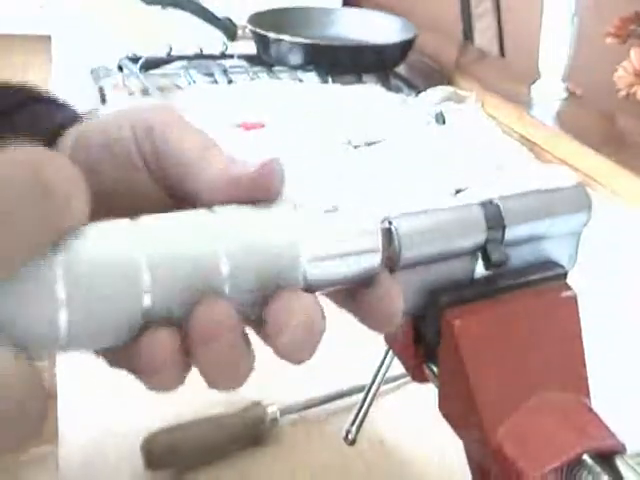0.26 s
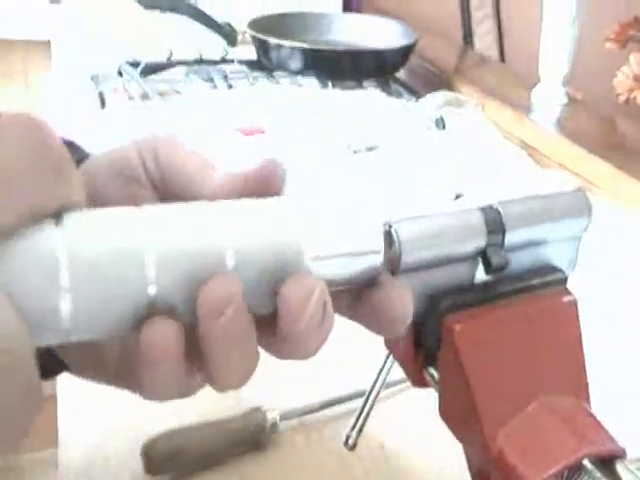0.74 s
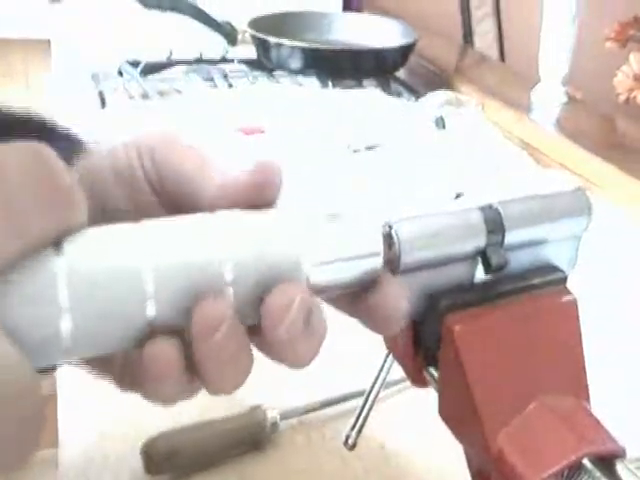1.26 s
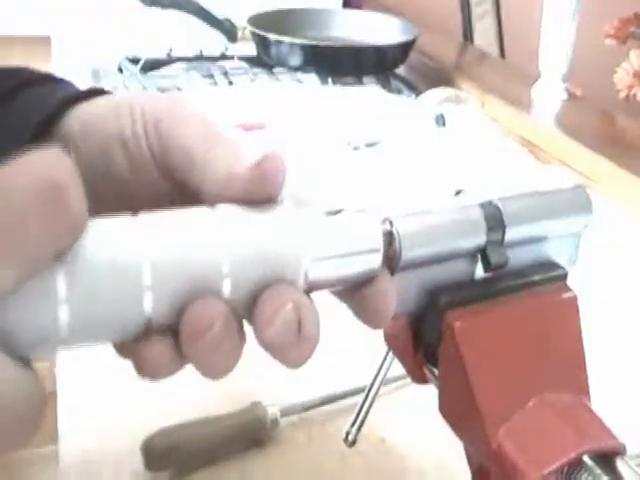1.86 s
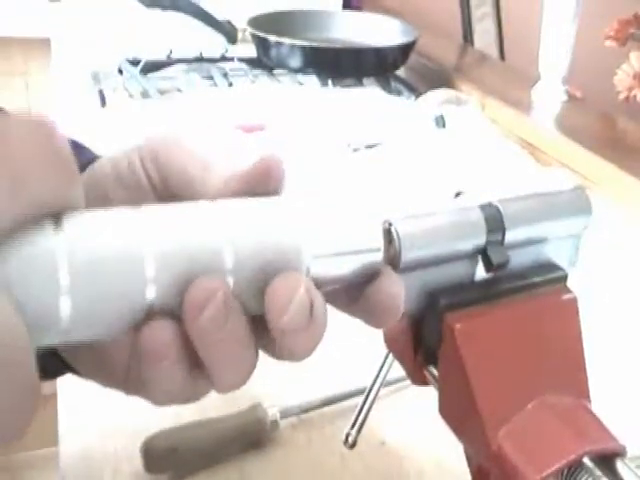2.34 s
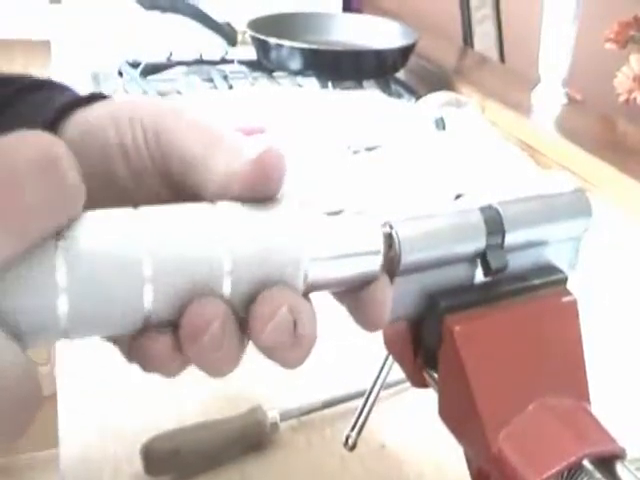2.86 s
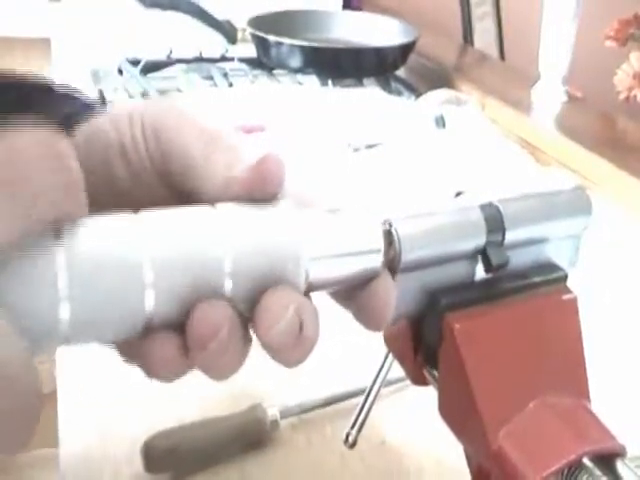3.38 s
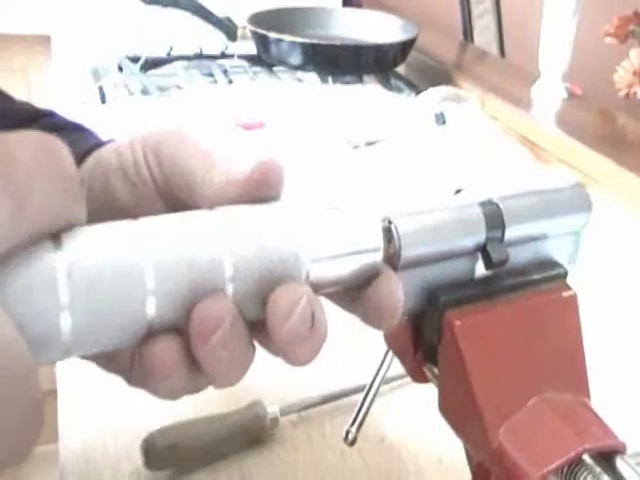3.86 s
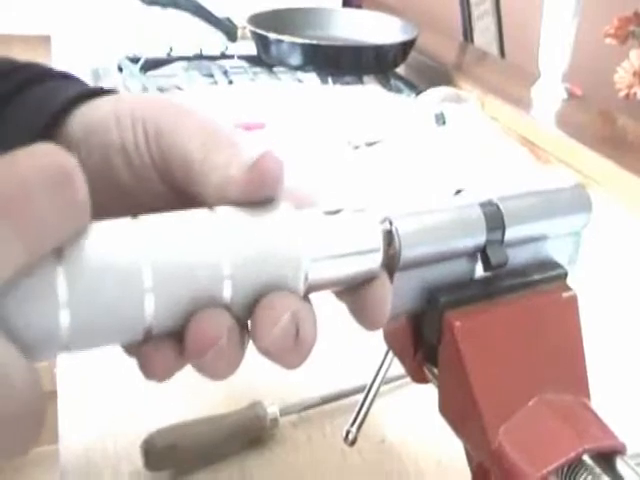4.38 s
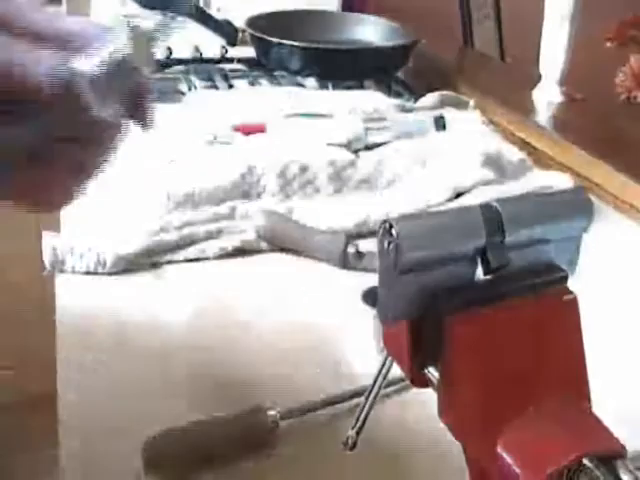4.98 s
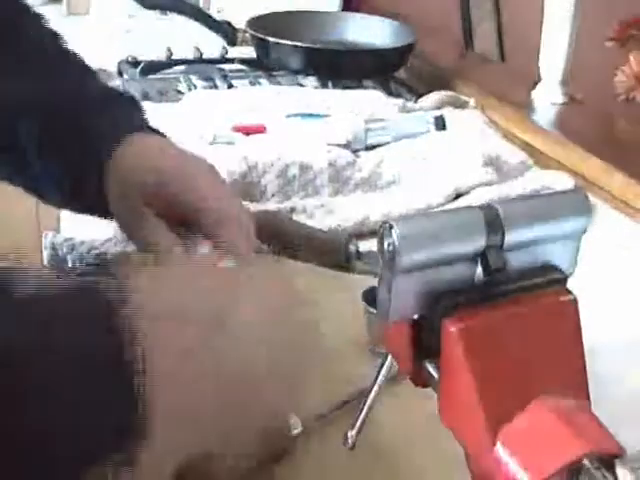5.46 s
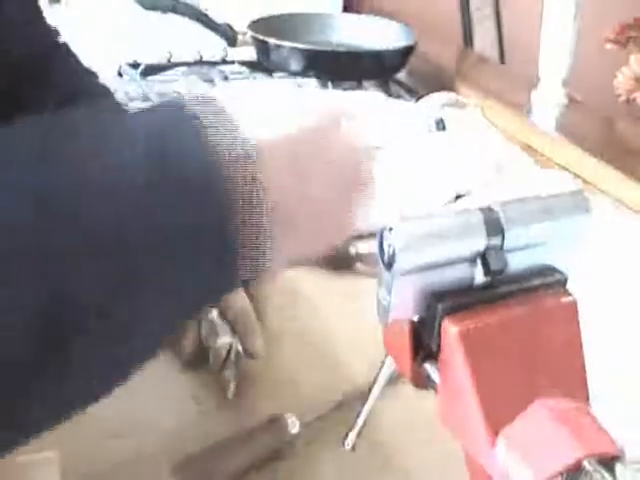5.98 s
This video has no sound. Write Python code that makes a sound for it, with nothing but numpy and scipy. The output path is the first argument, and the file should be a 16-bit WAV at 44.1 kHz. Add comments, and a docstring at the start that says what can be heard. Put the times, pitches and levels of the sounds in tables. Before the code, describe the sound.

Close, irregular clunks and metallic clicks over a rumbling, creaking table, a quick rasping pull, then small metal parts clinking and knocking on wood.

```python
"""Small quiet room: a key blank in a long handle is rocked and twisted in a cylinder lock in a table vice.
Each jolt, a burst of contact noise, rings modes of lock (tick), handle (knock) and table (thud).
The table rumbles and creaks under load; the blank is then dragged out over the pins as dense clicks.
Small metal parts are put down, clink and slide. Swish, rustle, thin tones, echoes and hiss are shaped noise,
the rustle with added grains of rubbing; all is heard through a close, noisy microphone pair."""
import sys
import numpy as np
from scipy import signal
from scipy.io import wavfile

SR = 44100
rng = np.random.default_rng(int(sys.argv[2]) if len(sys.argv) > 2 else 0)


def to_wav(sig):
    """Store sig (one row per channel, or 1-D mono) as 16-bit WAV at the path in sys.argv[1].

    Samples outside -1..1 are clipped; the rate is SR.
    """
    pcm = np.clip(np.atleast_2d(sig), -1, 1) * 32767
    pcm = np.round(pcm).astype(np.int16)
    wavfile.write(sys.argv[1], SR, pcm.T)  # frames by channels


N = 274807
BRIEF_SAMPLES = SR // 2   # noise enough for one short gesture

# jolts of the blank in the lock: start_s, knock_db, thud_db, tick_db, sparkle_db
JOLTS = [(0.0446, -48, -24.5, -31, -32), (0.2272, -14.5, -11.5, -25, -33), (0.391, -15.5, -16, -33, -41),
         (0.4184, -31, -46, -25, -30), (0.4648, -9, -43, -10, -14), (0.4808, -2, -17, -14, -27),
         (0.4921, -31, -37, -35, -25), (0.6733, -31, -22, -39, -34), (0.7622, 0.5, -18, -30, -22),
         (0.9353, 0.5, -30, -23, -33), (0.9454, -17, -33, -22, -24.5), (1.1069, -2.5, -30, -47, -42),
         (1.283, -3, -43, -36, -30), (1.2941, -49, -17, -13, -20.5), (1.3811, -8, -15.5, -26, -46),
         (1.4614, -6, -38, -15.5, -12), (1.4704, -21, -18.5, -16, -20), (1.483, -9.5, -16.5, -18, -26),
         (1.7318, -14.5, -15.5, -33, -39), (1.916, -11, -15, -30, -37), (2.0649, -27, -14.5, -34, -46),
         (2.1825, -45, -41, -17.5, -17), (2.2195, -7, -11.5, -11, -13), (2.2339, -5.5, -5.5, -18, -26),
         (2.2417, -20, -20, -32, -36), (2.4239, -26, -31, -24.5, -34), (2.4438, -20, -48, -43, -48),
         (2.5084, 0, -21, -24, -33), (2.604, -10, -28, -30, -36), (2.6705, -8.5, -17.5, -27.5, -42),
         (2.8686, -46, -49, -22, -33), (2.9021, -29, -37, -11, -9.5), (2.9108, -6.5, -28, -7, -19),
         (2.9244, -8.5, -20, -24, -17), (3.1524, -8, -9, -24, -35), (3.1749, -16, -45, -28, -38),
         (3.3089, -25, -21, -37, -43), (3.3301, -6.5, -21, -35, -32), (3.5693, -3.5, -9.5, -5, -19.5),
         (3.5803, -25, -36, -27, -26), (3.5906, -7, -10, -16.5, -23), (3.8314, -18, -30, -27.5, -27.5),
         (3.8546, -14, -22, -34, -36), (3.924, -1.5, -15.5, -51, -49), (4.0054, -39, -24.5, -30, -50),
         (4.1756, -28, -39, -12.5, -8.5), (4.1924, -10, -25, -28, -15), (4.213, -4.5, -14.5, -8.5, -10.5),
         (4.3856, -24, -14.5, -32, -36), (4.4152, -13, -37, -27, -39), (4.5407, -30, -19, -25, -29),
         (4.6574, -18, -52, -22, -19), (4.6635, -19, -19, -7, -6)]
# things put down on the table: start_s, knock_db, thud_db, tick_db, sparkle_db, push_db, crack_db
DROPS = [(5.271, -9.5, -15.5, -36, -39, -6.5, -28), (5.3163, -5, -30, -43, -39, -29, -19.5),
         (5.3423, -11, -35, -34, -33, -29, -36), (5.4136, -36, -45, -34, -42, -21.5, -29),
         (5.5579, -21, -30, -18, -28, -29, -21), (5.591, -5, -11.5, -10.5, -24, -21, -14),
         (5.626, -9, -15.5, -12, -21, -29, -11), (5.6522, 0.5, -16, -12, -41, -33, -13),
         (5.673, -8.5, -15.5, -22, -46, -23, -25), (5.8949, -17.5, -35, -42, -44, -26, -33),
         (5.9637, -6.5, -19, -16.5, -27, -4.5, -4.5), (5.9868, -11, -26, -26, -32, -21, -15)]
# loose parts touch: start_s, level_db
CLINKS = [(5.465, -33), (5.4905, -27.5), (5.5925, -20), (5.6224, -28), (5.6528, -23), (5.6755, -26)]
# blank dragged out over the pins: time_s, level_db
PULL_CURVE = [(4.67, -27), (4.676, -47), (4.718, -17), (4.728, -12), (4.774, -6.5), (4.79, -36),
              (4.848, -36), (5.04, -41.5), (5.06, -54)]
# loose parts slide over the table: time_s, level_db
SLIDE_CURVE = [(5.44, -43), (5.652, -31.5), (5.78, -44)]
# swish: time_s, level_db
SWISH_CURVE = [(0.62, -63), (0.674, -29.5), (0.76, -13.5), (0.88, -22.5), (0.94, -32), (1.02, -42)]
# hands and parts moving about: time_s, level_db
RUSTLE_CURVE = [(0.0, -46), (0.7, -47), (0.85, -22), (1.06, -49), (1.79, -48), (2.38, -36.5), (2.65, -60),
                (2.93, -46), (3.3, -40), (3.35, -39.5), (3.5, -43.5), (4.2, -50.5), (4.35, -39),
                (4.7, -45.5), (4.84, -36), (5.08, -40.5), (5.34, -40), (5.5, -35.5), (5.93, -32),
                (6.23, -39)]
# faint thin tones: start_s, end_s, pitch_hz, level_db
WHISTLES = [(0, 5.7, 2684, -54), (4.801, 5.25, 4300, -47), (6.0, 6.7, 1880, -45)]

# spells of load on the table, from the twisting hand and from things put down:
# full_load_s, hold_s, heave_db, sway_db, hum_db, creak_db
STRAINS = [(0.045, 0.45, -28, -17.5, -26.5, -39), (0.471, 0.064, -30, -25, -17, -26.5),
           (0.688, 0.38, -21, -19.5, -22, -25.5), (1.095, 0.65, -34, -17, -23.5, -29.5),
           (1.456, 0.1, -31, -40, -19.5, -33.5), (1.747, 0.07, -20, -24, -26, -33.5),
           (1.9, 0.23, -33, -21, -21, -31.5), (2.224, 0.082, -42, -46, -21.5, -27),
           (2.437, 0.32, -41, -16.5, -21, -28), (2.907, 0.04, -24, -32, -30.5, -24),
           (3.156, 0.13, -18, -18, -28, -26.5), (3.318, 0.034, -29, -29, -19.5, -25.5),
           (3.574, 0.04, -35, -23, -28, -22), (3.839, 0.19, -28, -18.5, -23, -28),
           (4.191, 0.048, -42, -39, -25.5, -23.5), (4.388, 0.059, -19.5, -19.5, -25.5, -29.5),
           (4.692, 0.14, -43, -46, -25, -25.5), (5.284, 0.058, -42, -44, -35, -26),
           (5.473, 0.33, -39, -43, -35, -27.5), (5.96, 0.056, -35, -45, -39, -27.5)]
# fall after a spell, one value each for heave, sway, hum, creak: release_db_per_s
STRAIN_RELEASE_DB_PER_S = [61, 93, 92, 162]
# level between spells, one row each for heave, sway, hum, creak: hand_on_db, hand_off_db
STRAIN_REST_DB = [(-31.5, -26), (-36, -45), (-34, -41), (-49, -50)]
STRAIN_ATTACK_S, STRAIN_SAG_DB_PER_S = 0.018, 20   # load comes on fast, slackens while held
LET_GO_S, LET_GO_FADE_S = 4.75, 0.12   # the hand leaves the vice
THUD_LAG_S = 0.00047   # the blow reaches the table through the vice

# slow heave of the table: pitch_hz, level_db, t60_s
HEAVE_MODES = [(9.1, 4, 0.21), (21.7, 12, 0.38)]
# sway of the table: pitch_hz, level_db, t60_s
SWAY_MODES = [(54, -7, 0.48), (68, 0, 0.16)]
# hum of the table: pitch_hz, level_db, t60_s
HUM_MODES = [(112.7, 8, 0.4), (147.4, -6.5, 1)]
# table top: pitch_hz, level_db, t60_s
TABLE_MODES = [(216.5, -20, 0.24), (316.3, -10.5, 0.15), (376, -8.5, 0.047), (456, -3, 0.064),
               (520, -4.5, 0.065), (645, 0, 0.015), (766, -8, 0.047), (910, -5.5, 0.01), (1220, -21, 0.016)]
# handle: pitch_hz, level_db, t60_s
HANDLE_MODES = [(780, -17, 0.0022), (1080, -5.5, 0.0052), (1350, -6.5, 0.0032), (1806, -4, 0.0054),
                (2040, -15, 0.0027)]
# lock body: pitch_hz, level_db, t60_s
LOCK_MODES = [(2890, -32, 0.0015), (3786, 0.5, 0.0048), (4580, -1, 0.0037), (5120, 3.5, 0.0031),
              (5900, 0, 0.00078)]
# pins, the sparkle: pitch_hz, level_db, t60_s
PIN_MODES = [(6860, -1, 0.0008), (9000, 0, 0.003), (9810, 4.5, 0.003), (10740, -1, 0.0043),
             (11560, -8.5, 0.0019), (14000, -4, 0.0012)]
# loose metal parts: pitch_hz, level_db, t60_s
PART_MODES = [(1540, 7, 0.041), (2265, 4, 0.11), (2970, 0, 0.069), (3340, 7, 0.035), (3950, 3, 0.13),
              (4750, 0, 0.044), (5880, -1.5, 0.084), (6330, -6, 0.065), (9500, -6, 0.07)]
# low push of things put down: pitch_hz, level_db, t60_s
PUSH_MODES = [(227, -19, 0.033), (352, -7.5, 0.019), (410, -25, 0.021)]
# crack of things put down: pitch_hz, level_db, t60_s
CRACK_MODES = [(2080, -13, 0.0036), (2770, 2.5, 0.0041), (3100, 5, 0.0036)]
# blade of the blank: pitch_hz, level_db, t60_s
BLADE_MODES = [(2250, -12, 0.014), (3730, -14, 0.0062), (4770, -6, 0.0047), (5070, 5.5, 0.007),
               (5950, 0.5, 0.0022), (7650, 0, .0015), (9540, 4, .003), (10500, -7, 0.0023),
               (11000, 0, 0.0062), (14400, -15, 0.0014)]
# what rubbing favours: pitch_hz, level_db, t60_s
RUB_MODES = [(2167, 5.5, 0.036), (2640, -9, 0.032)]

# swish spectrum: freq_hz, level_db_per_hz
SWISH_COLOUR = [(150, -39), (250, -14), (336, -7), (640, -14.5), (890, -19), (1140, -16.5), (4650, -14),
                (6470, -25), (11300, -28), (16000, -38)]
# rustle spectrum: freq_hz, level_db_per_hz
RUSTLE_COLOUR = [(470, -46), (800, -11), (973, -0.5), (2590, 4.5), (2930, 0.5), (5400, -7.5), (11400, -14),
                 (12500, -31), (16200, -54), (22000, -120)]
# room and microphone hiss spectrum: freq_hz, level_db_per_hz
HISS_COLOUR = [(26, -30), (45, 0.5), (76, -6.5), (124, -11), (253, -14), (435, -19.5), (1250, -28),
               (2440, -35), (2630, -35), (2900, -32), (10500, -35.5), (15100, -45.5), (16300, -66)]
# left-right likeness of noise: freq_hz, likeness (0 to 1)
LIKENESS = [(60, 0.61), (150, 0.85), (380, 0.92), (950, 0.56), (2380, 0.17), (5980, 0.93), (15000, 0.97)]
# echoes of the room: low_hz, high_hz, level_db, t60_s
ROOM_BANDS = [(104, 576, -6, 0.45), (850, 4020, -7, 0.28), (2880, 9700, -8, 0.21),
              (7400, 20000, -6.5, 0.16)]
HISS_DB, CUTOFF_HZ = -33, 16500


def blows():
    """Every blow thuds in the table, knocks in wood or handle and ticks in metal; loose parts ring on."""
    start_s, knock_db, thud_db, tick_db, sparkle_db = np.vstack([JOLTS, np.array(DROPS)[:, :5]]).T
    thud = struck(start_s + THUD_LAG_S, thud_db, TABLE_MODES, contact_s=0.0061, unlike=0.094)
    thud = butter_filter(thud, 2, 270, "high")   # keeps the thud lean below 270 Hz
    knock = struck(start_s, knock_db, HANDLE_MODES, contact_s=0.0029, unlike=0.31)
    knock = butter_filter(knock, 2, 3400, "low")   # a soft grip dulls the contact
    tick = struck(start_s, tick_db, LOCK_MODES, contact_s=0.0031, unlike=0.34)
    sparkle = struck(start_s, sparkle_db, PIN_MODES, contact_s=0.0024, unlike=0.37)

    drop_s, *_, push_db, crack_db = np.transpose(DROPS)
    push = struck(drop_s, push_db, PUSH_MODES, contact_s=0.00015, unlike=0.3, clean=2.7)
    crack = struck(drop_s, crack_db, CRACK_MODES, contact_s=0.0017, unlike=0.49)

    clink_s, clink_db = np.transpose(CLINKS)
    clinks = struck(clink_s, clink_db, PART_MODES, contact_s=0.0001, unlike=0.2)
    return thud + knock + tick + sparkle + push + crack + clinks


def pull():
    """The blade rasps over the pins: dense clicks into its modes and the upper modes of the table."""
    rasp = stereo_grains(6000, 1.0, unlike=0.37)
    blade = rubbed(rasp, BLADE_MODES)
    wood = butter_filter(rubbed(rasp, TABLE_MODES), 3, 430, "high")
    return gain_curve(PULL_CURVE) * gesture(blade + from_db(-8) * wood)


def slide():
    """Sliding parts chatter: grit excites lock-like modes, the parts' own rings and handle-like wood."""
    grit = stereo_grains(1500, 1.7, unlike=0.21)
    broad = rubbed(grit, LOCK_MODES)
    parts = from_db(-1) * rubbed(grit, PART_MODES)
    wood = from_db(2) * rubbed(grit, HANDLE_MODES)
    return gain_curve(SLIDE_CURVE) * gesture(broad + parts + wood)


def shaking():
    """Under load the table heaves, sways and hums (noise into low modes) and creaks (friction clicks)."""
    heave_gain, sway_gain, hum_gain, creak_gain = strain()
    heave = heave_gain * rubbed(rng.standard_normal(N), HEAVE_MODES)
    sway = sway_gain * rubbed(rng.standard_normal(N), SWAY_MODES)
    hum = hum_gain * rubbed(rng.standard_normal(N), HUM_MODES)
    friction = grains(2000, 2.1)
    creak = rubbed(friction, TABLE_MODES) + from_db(-13.5) * rubbed(friction, HANDLE_MODES)
    return heave + sway + hum + creak_gain * creak


def strain():
    """Gains of heave, sway, hum, creak: spells rise, sag, let go; their powers add to a rest level."""
    full_load_s, hold_s, *columns_db = np.transpose(STRAINS)
    hold_s = hold_s[:, None]
    t = np.arange(0, N + 100, 100) / SR   # coarse time grid
    since_s = t - full_load_s[:, None]
    rise = np.clip(1 + since_s / STRAIN_ATTACK_S, 0, 1) ** 2
    held_s = np.clip(since_s, 0, hold_s)
    gone_s = np.maximum(since_s - hold_s, 0)
    hand_off = np.clip((t - LET_GO_S) / LET_GO_FADE_S, 0, 1)
    gains = []
    for load_db, release, (on_db, off_db) in zip(columns_db, STRAIN_RELEASE_DB_PER_S, STRAIN_REST_DB):
        spell_db = load_db[:, None] - STRAIN_SAG_DB_PER_S * held_s - release * gone_s
        rest_db = on_db + (off_db - on_db) * hand_off
        power = from_db(rest_db) ** 2 + np.sum(rise * from_db(spell_db) ** 2, axis=0)
        gains.append(np.interp(np.arange(N) / SR, t, np.sqrt(power)))
    return gains


def swish():
    """One hand-like swish: coloured noise, swelling and fading."""
    noise = banded(SWISH_COLOUR, unlike=1.04, size=BRIEF_SAMPLES)
    return gain_curve(SWISH_CURVE) * gesture(noise)


def rustle():
    """Hands and parts moving about: coloured noise plus rubbing clicks in two soft resonances."""
    rub = rubbed(grains(1500, 3.5), RUB_MODES)   # skin on the grip
    return gain_curve(RUSTLE_CURVE) * (banded(RUSTLE_COLOUR, unlike=0.99) + from_db(-10) * rub)


def whistles():
    """Faint thin tones: noise twice through a narrow resonance, faded in and out."""
    t = np.arange(N) / SR
    total = np.zeros(N)
    for start_s, end_s, pitch_hz, level_db in WHISTLES:
        fade = np.clip(np.minimum(t - start_s, end_s - t) / 0.026, 0, 1)
        once = ring(rng.standard_normal(N), pitch_hz, 0.063)
        tone = rms_one(ring(once, pitch_hz, 0.063))
        total += from_db(level_db) * fade * tone
    return total


def room(x):
    """Dense echoes: noise that dies faster in the treble, partly its own on each side."""
    t = np.arange(SR // 2) / SR
    shared, own = rng.standard_normal(len(t)), rng.standard_normal((2, len(t)))
    echoes = np.zeros((2, len(t)))
    for low_hz, high_hz, level_db, t60_s in ROOM_BANDS:
        band = butter_filter(1.37 * shared + own, 2, [low_hz, high_hz], "band")
        fall = from_db(-60 * t / t60_s) * np.clip(t / 0.0095, 0, 1)
        echoes += from_db(level_db) * band * fall / np.sqrt(np.sum(fall ** 2))
    return signal.fftconvolve(x, echoes, axes=1)[:, :N]


def hiss():
    """Steady coloured noise of room and microphone."""
    return from_db(HISS_DB) * banded(HISS_COLOUR, unlike=1.8)


def struck(times_s, level_db, modes, contact_s, unlike, clean=0):
    """A blow: contact chatter plus a clean push swells, dies and rings the modes; sides differ a little."""
    length = 2000
    start = np.round(np.asarray(times_s) * SR).astype(int)
    first = start.min()
    span = np.arange(length) / (contact_s * SR)
    swell = np.exp(-span) - np.exp(-6 * span)
    chatter = rng.standard_normal((len(start), 2, length))
    mid = (chatter[:, 0] + clean) * swell
    side = chatter[:, 1] * swell
    strength = from_db(level_db)[:, None] / np.sqrt(np.sum(mid ** 2, axis=1, keepdims=True))
    where = (start[:, None] + np.arange(length)).ravel()
    force = []
    for sign in (1, -1):
        pulses = (mid + sign * unlike * side) * strength
        force.append(np.bincount(where, pulses.ravel(), N + length))
    force = np.array(force)[:, first:N]
    rung = sum(from_db(db) * ring(force, hz, t60_s) for hz, db, t60_s in modes)
    return np.pad(rung, ((0, 0), (first, 0)))


def rubbed(x, modes):
    """Steady friction keeps all modes of a body sounding; rms 1."""
    return rms_one(sum(from_db(db) * rms_one(ring(x, hz, t60_s)) for hz, db, t60_s in modes))


def ring(x, pitch_hz, t60_s):
    """Two-pole resonator: a unit click starts a decaying sine of height about 1."""
    radius = from_db(-60 / (t60_s * SR))
    w = 2 * np.pi * pitch_hz / SR
    return signal.lfilter([0, np.sin(w)], [1, -2 * radius * np.cos(w), radius ** 2], x + 1e-18)


def grains(rate_per_s, spread_db):
    """Random clicks of uneven size and either sign."""
    sizes = from_db(spread_db * np.minimum(rng.exponential(1, N), 4)) * rng.choice([-1, 1], N)
    return sizes * (rng.random(N) < rate_per_s / SR)


def stereo_grains(rate_per_s, spread_db, unlike):
    """A brief run of clicks, with extra clicks in opposite sign on the two sides."""
    shared = grains(rate_per_s, spread_db)
    side = grains(rate_per_s, spread_db) * [[1], [-1]]
    return (shared + unlike * side)[:, :BRIEF_SAMPLES]


def banded(spectrum, unlike, size=N):
    """Third-octave bands of stereo noise, each with its own level and likeness; rms 1 before left/right."""
    edges_hz = 16 * 2 ** np.arange(0, 10.1, 1 / 3)
    white = rng.standard_normal((2, 2, size))   # neighbouring bands get unrelated noise
    mid_side = np.zeros((2, size))
    for k, (low_hz, high_hz) in enumerate(zip(edges_hz, edges_hz[1:])):
        hz = np.sqrt(low_hz * high_hz)
        if hz > spectrum[0][0]:
            alike = np.clip(1 - unlike * (1 - at_hz(LIKENESS, hz)), 0, 1)
            band = butter_filter(white[k % 2], 2, [low_hz, high_hz], "band")
            mid_side += band * from_db(at_hz(spectrum, hz)) * np.sqrt([[1 + alike], [1 - alike]])
    mid, side = rms_one(mid_side)
    return np.array([mid + side, mid - side]) / np.sqrt(2)


def gesture(x):
    """A brief stereo stretch repeated over the whole span, to be gated by a curve."""
    return np.resize(x.T, (N, 2)).T


def gain_curve(points):
    """A dB curve as a gain in time, silent outside its span."""
    time_s, level_db = np.transpose(points)
    return from_db(np.interp(np.arange(N) / SR, time_s, level_db, -200, -200))


def at_hz(points, hz):
    """A spectrum read on a log frequency axis."""
    freq_hz, value = np.transpose(points)
    return np.interp(np.log(hz), np.log(freq_hz), value)


def butter_filter(x, order, hz, kind):
    """Butterworth filter."""
    return signal.sosfilt(signal.butter(order, hz, kind, fs=SR, output="sos"), x)


def from_db(db):
    """Gain of a level."""
    return 10 ** (np.asarray(db) / 20)


def rms_one(x):
    """Scaled to rms 1."""
    return x / np.sqrt(np.mean(x ** 2) + 1e-20)


def scene():
    """Lock, table and parts in front, the room around, hiss below."""
    close = blows() + pull() + slide()
    return close + shaking() + swish() + rustle() + whistles() + room(close) + hiss()


def record(dry):
    """Peaks are rounded; treble is 5 dB lower above about 12 kHz, with nothing above about 16 kHz."""
    rounded = dry / (1 + np.abs(dry) ** 4) ** 0.25
    below = signal.sosfilt(signal.cheby1(10, 0.5, 11950, fs=SR, output="sos"), rounded)
    above = signal.sosfilt(signal.cheby1(6, 0.5, 12700, "high", fs=SR, output="sos"), rounded)
    top_cut = signal.cheby2(16, 60, CUTOFF_HZ, fs=SR, output="sos")
    return signal.sosfilt(top_cut, below + from_db(-5) * above)


dry = scene()
out = record(dry)
to_wav(out)
```